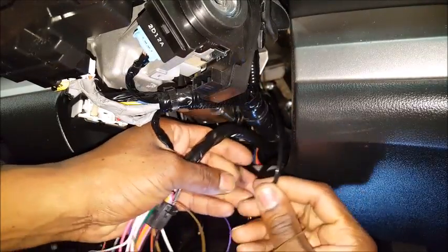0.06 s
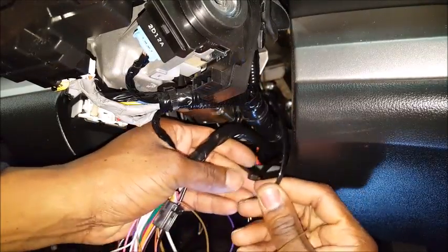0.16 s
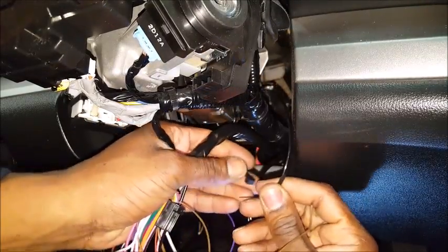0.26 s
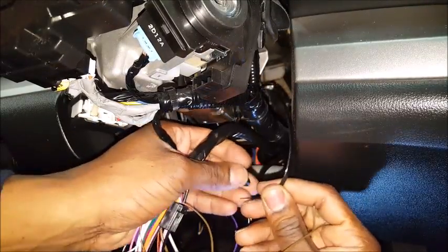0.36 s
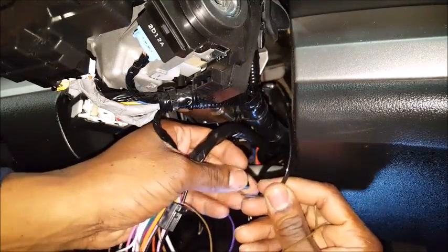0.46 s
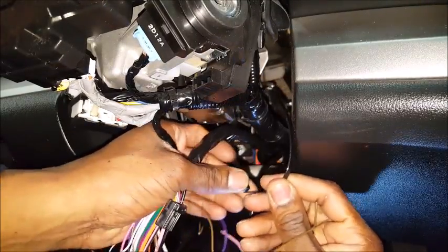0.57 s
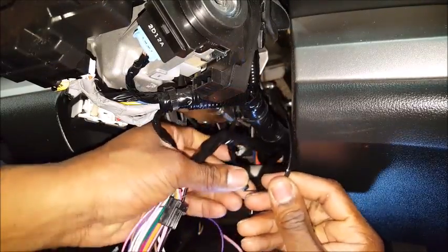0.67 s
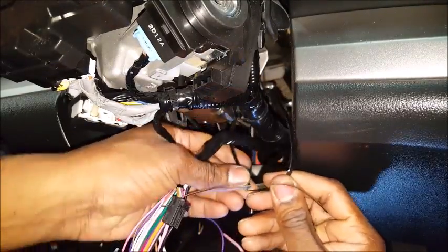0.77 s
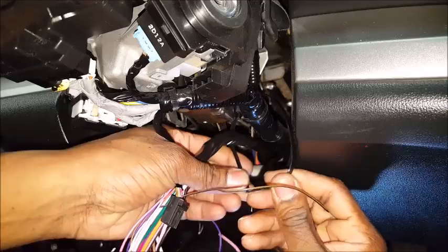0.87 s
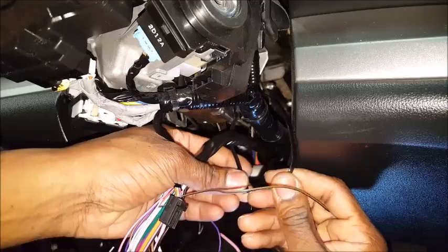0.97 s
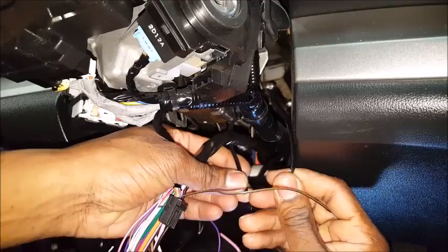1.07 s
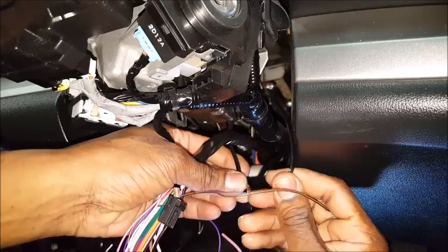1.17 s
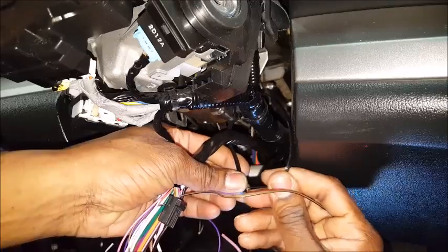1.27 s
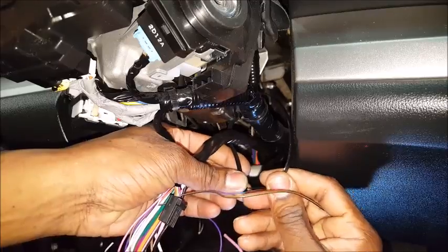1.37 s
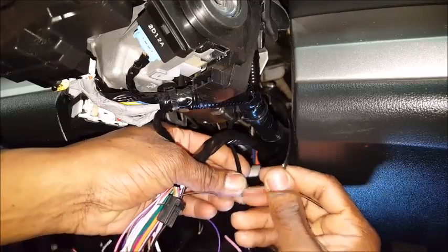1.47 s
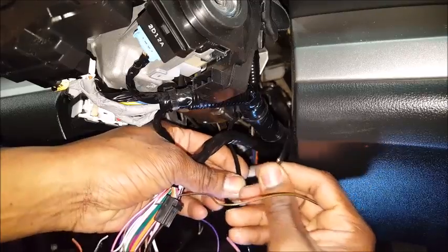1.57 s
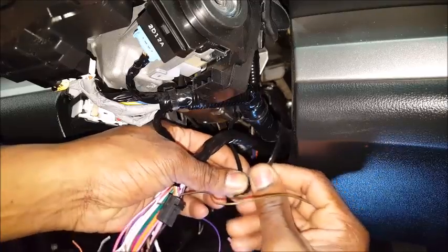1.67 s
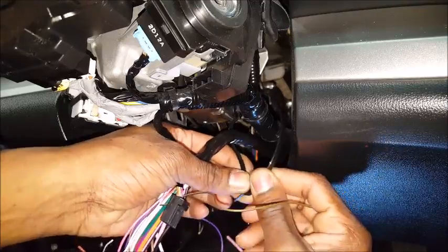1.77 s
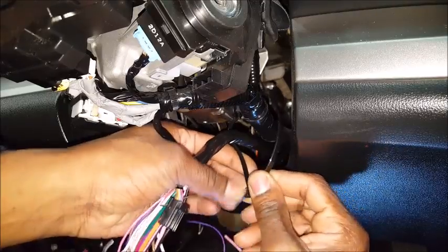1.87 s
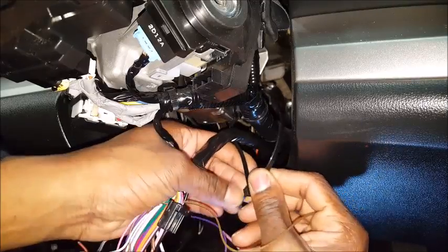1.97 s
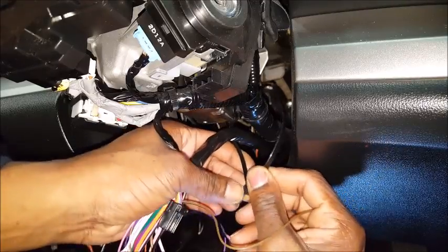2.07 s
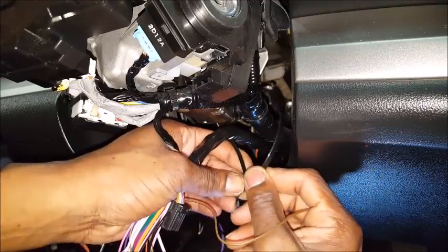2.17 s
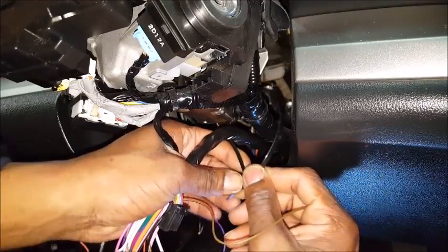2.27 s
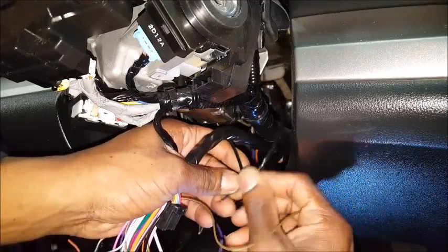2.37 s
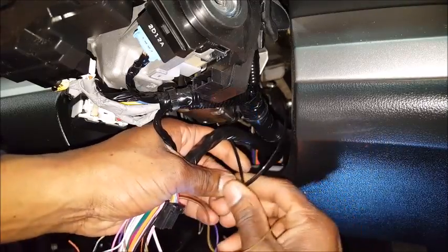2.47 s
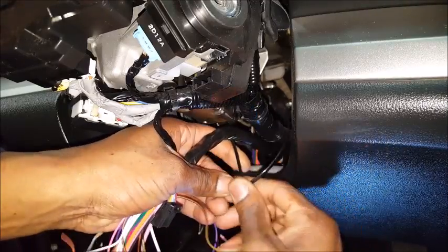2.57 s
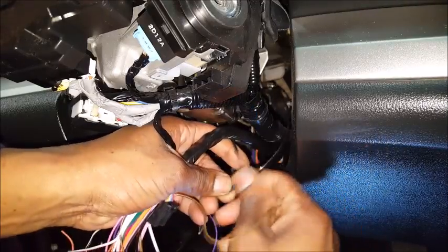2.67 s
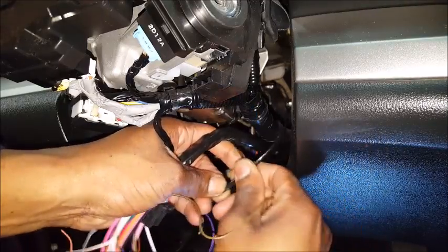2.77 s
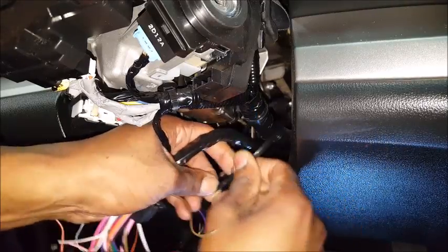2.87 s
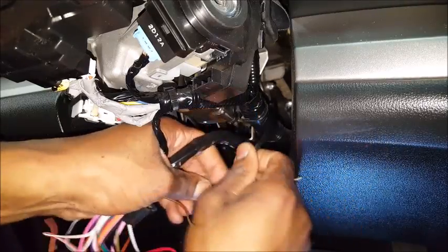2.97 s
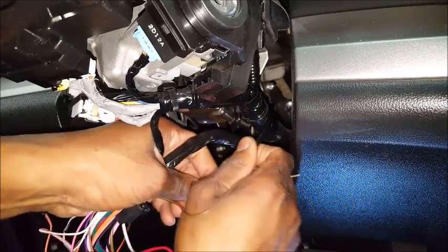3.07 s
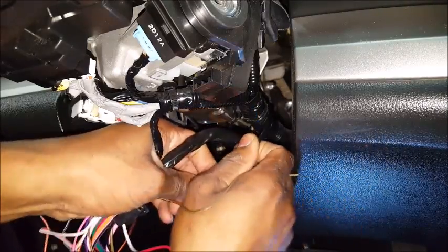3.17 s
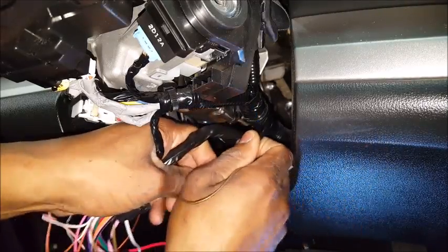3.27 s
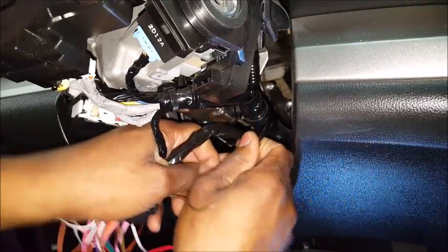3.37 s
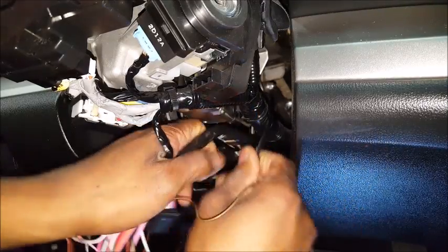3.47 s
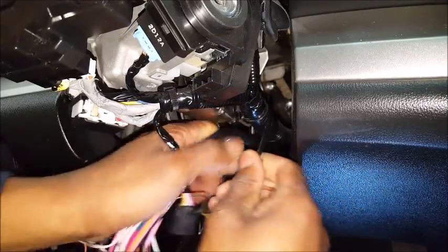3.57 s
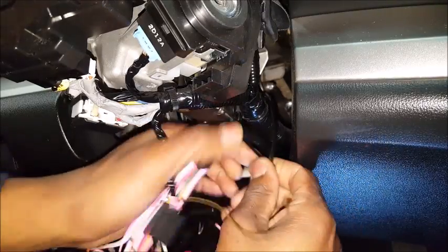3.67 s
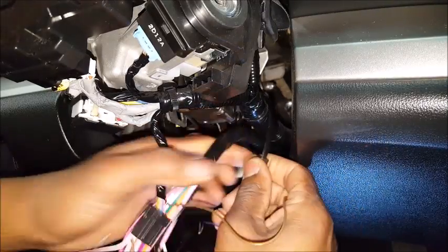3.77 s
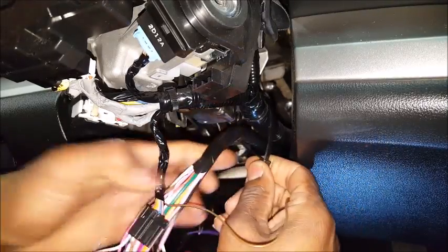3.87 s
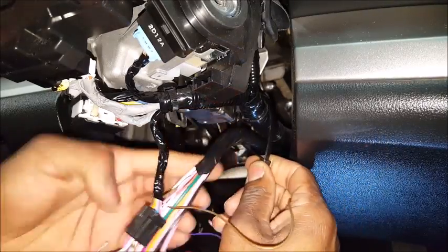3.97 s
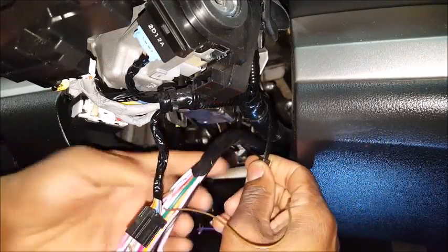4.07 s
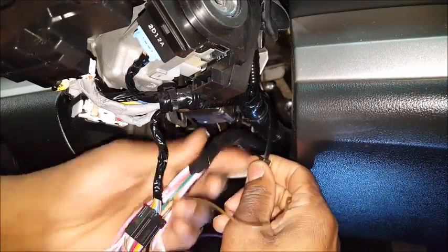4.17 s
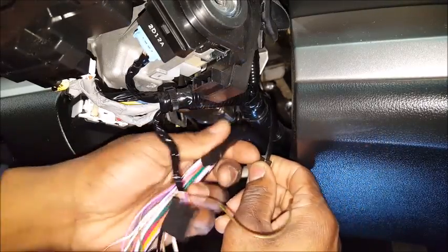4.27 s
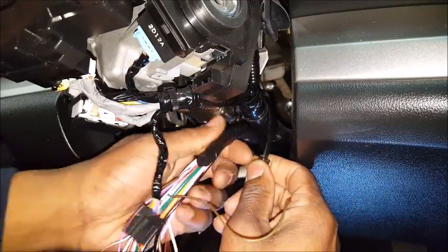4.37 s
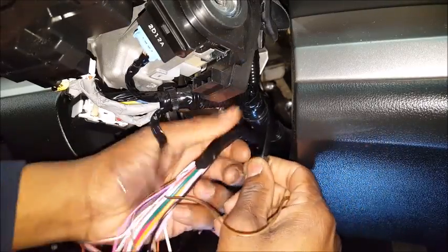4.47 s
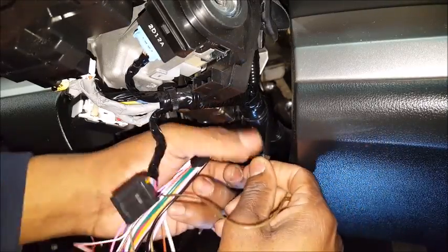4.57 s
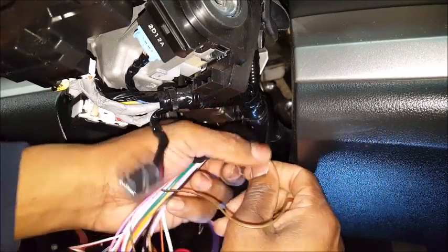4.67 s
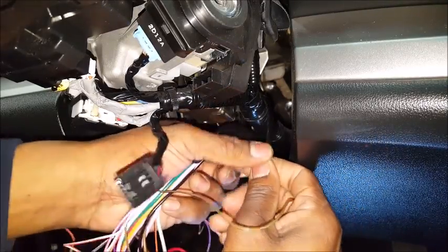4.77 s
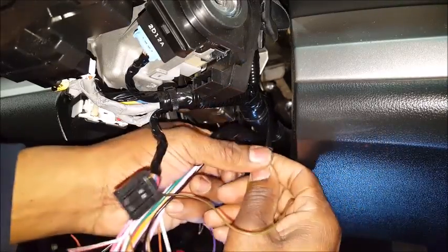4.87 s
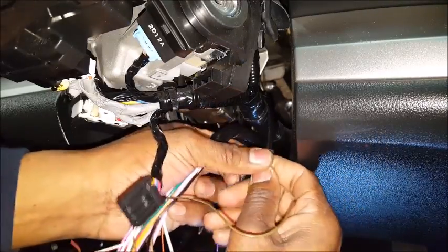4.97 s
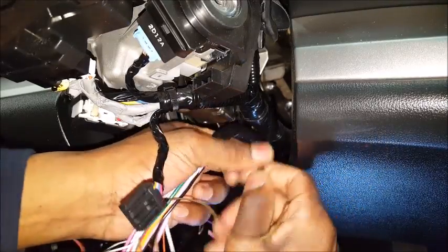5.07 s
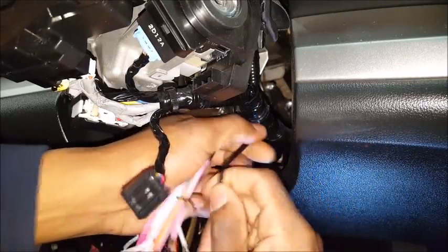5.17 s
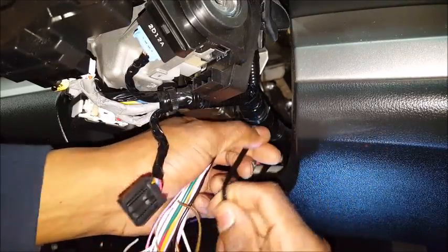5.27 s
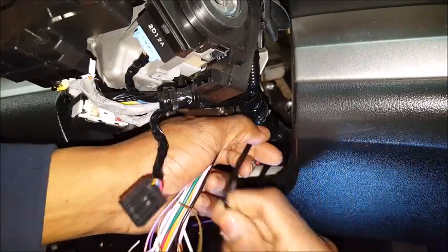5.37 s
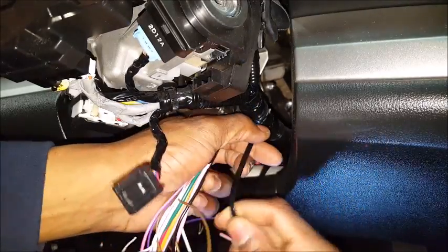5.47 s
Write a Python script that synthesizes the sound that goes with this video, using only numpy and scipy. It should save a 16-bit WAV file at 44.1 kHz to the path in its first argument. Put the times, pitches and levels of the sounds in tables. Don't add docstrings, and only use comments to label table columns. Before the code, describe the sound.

Very close stereo sound in a small, dry car footwell. Fingertips tap and scuff wires and loose clips, sparse and faint over low hum. A cable tie then clicks rapidly through its head, much louder and brighter than the handling. After a few stray catches come rustles, dull bumps on trim and a sharp snap, then a second, quicker zip slows into single clicks.

```python
import sys
import numpy as np
from scipy import signal
from scipy.fft import rfft, irfft, next_fast_len
from scipy.io import wavfile
from scipy.ndimage import uniform_filter1d

SR = 44100
rng = np.random.default_rng(int(sys.argv[2]) if len(sys.argv) > 2 else 0)


def unload_audio(sound):
    columns = np.transpose(np.atleast_2d(sound))
    steps = np.round(np.clip(columns, -1, 1) * 32767)
    wavfile.write(sys.argv[1], SR, steps.astype(np.int16))


def field_ratio(decibels):
    return 10 ** (np.asarray(decibels, dtype=float) / 20)


N = 243873

# time in seconds, teeth passed so far.
SLIDE_TRAVEL = [
    [(2.7324, 0), (2.7366, 2), (2.7484, 8), (2.7505, 9), (2.7535, 10)],
    [(5.1198, 0), (5.1329, 4), (5.1386, 6), (5.1511, 10), (5.1624, 14), (5.1696, 17), (5.1791, 22),
     (5.1849, 26), (5.195, 36), (5.2015, 42), (5.2104, 48), (5.2207, 56), (5.2264, 60), (5.232, 63),
     (5.2341, 64), (5.2371, 65), (5.2407, 66)],
]
# time in seconds, snap level in dB, push relative to it in dB,
# lean to the left in dB.
SLIDE_EFFORT = [
    [(2.732, -16, -27, 0), (2.74, -15, -23, -5), (2.746, -20, -26, -3), (2.7545, -13, -30.5, 0.3)],
    [(5.119, -22, -32, 8), (5.14, -21, -22.5, -1), (5.158, -19, -23, -4), (5.17, -19.5, -24, 1.2),
     (5.182, -15.5, -29, -1), (5.19, -22.5, -24, -2), (5.203, -19.5, -24, 0), (5.222, -22, -29.5, 0),
     (5.241, -23, -29, 8)],
]
# time in seconds, snap level in dB,
# push on the strap relative to it in dB, knock relative to it in dB.
CATCHES = [(2.7603, -14, -25, -28), (2.7711, -19, -18.5, -21), (2.7815, -17, -23.5, -31),
           (2.7915, -21, -30, -19.5), (2.8105, -18, -15, -52), (2.8312, -19, -15.5, -57),
           (2.8435, -16.5, -17, -50), (3.1028, -19.5, -12, -51), (3.1114, -15, -19, -46),
           (3.1206, -21.5, -17, -31), (3.1454, -18.5, -14.5, -56), (3.1957, -20, -16.5, -57),
           (3.2755, -21, -8, -20), (5.1133, -19, -11.5, -32), (5.2492, -21, -19, -44),
           (5.2624, -21.5, -20, -24), (5.2779, -23.5, -11.5, -29), (5.3268, -22, -16.5, -28),
           (5.3373, -22, -35, -50), (5.3483, -20, -19.5, -51), (5.3603, -21, -18.5, -58),
           (5.373, -25.5, -17.5, -46), (5.3813, -22.5, -10.5, -56), (5.3942, -21.5, -15, -37),
           (5.4196, -19, -20.5, -45)]
# time in seconds, snap level in dB.
STEADY_TEETH = [(2.851, -22), (2.8564, -21), (2.8642, -16.5), (2.8743, -16), (2.8835, -14), (2.892, -20),
                (2.8998, -17), (2.9093, -17.5), (2.917, -17), (2.9281, -20.5), (2.9372, -18), (2.9457, -17),
                (2.9534, -23), (2.9614, -16), (2.97, -18.5), (2.9778, -18.5), (2.9847, -18),
                (2.9902, -17.5), (2.9944, -18), (2.9977, -18), (3.0065, -18), (3.0159, -19.5), (3.022, -17),
                (3.0309, -18), (3.0411, -15), (3.0524, -17.5), (3.065, -18), (3.0755, -17), (3.0857, -19),
                (3.095, -19.5)]
# time in seconds, push and knock relative to the snap in dB.
STEADY_EFFORT = [
    (2.85, -20, -28.5),
    (2.92, -25.5, -32),
    (2.975, -22, -19.5),
    (2.994, -27.5, -20.5),
    (3.02, -24, -28),
    (3.065, -29, -38),
    (3.095, -21, -35),
]
# time in seconds, pitch of the pawl's ring in Hz,
# lean to the left of the snap in dB, of the push in dB.
CLOSING_LOOP = [(2.73, 12600, -2, -7), (2.795, 11300, 5, 16), (2.81, 11400, 0, 13.5),
                (2.92, 10300, -0.5, 1), (2.97, 10400, 2, 0), (3.1, 11400, 1.5, 1), (3.28, 11860, -2, 5.5),
                (5.11, 13450, -9, -15.5), (5.19, 13100, -3, 4.5), (5.28, 11500, 1, -3.5),
                (5.33, 11000, 1, 5.5), (5.42, 10700, 1.5, 10.5)]
# frequency in Hz, level in dB per Hz.
SLOW_RING = [(4000, -34.5), (6300, -20.5), (6750, -14), (7600, -11), (8600, -10.5), (9600, -9.5),
             (10800, -8), (12000, -7), (13500, -4.5), (15000, -9), (15800, -7), (16500, -34)]
# frequency in Hz, level in dB per Hz.
FAST_RING = [(2650, -21), (4500, -31), (6200, -24), (6910, -18), (8320, -17), (9270, -17), (10400, -9),
             (11200, -6.5), (12000, -5.5), (12900, -1.5), (14000, -6.5), (15800, -7), (16500, -25)]
# start in seconds, length in seconds, level in dB.
DRAGS = [
    (2.733, .065, -63),
    (2.845, 0.25, -40.5),
    (5.115, 0.139, -33.5),
    (5.327, 0.083, -41),
]
# frequency in Hz, level in dB per Hz.
DRAG_COLOUR = [(300, -18), (1000, -17), (2500, -5.5), (5000, -1.5), (6300, -7.5), (6800, -2), (8000, 0.5),
               (9500, 3.5), (11000, 16), (12500, 4.5), (15800, -2.5), (16000, -56)]
# time in seconds, level in dB, fizz relative to it in dB,
# ring in Hz.
TAPS = [(0.0273, -48.5, 16, 1580), (0.0643, -45, 4, 1010), (0.0803, -51.5, 12.5, 2780),
        (0.2956, -41, -11, 1150), (0.3097, -36.5, -11, 2250), (0.4245, -50, -17, 1240),
        (0.452, -29, 6.5, 2200), (0.5792, -41.5, -21, 1550), (0.7035, -42.5, -26, 1210),
        (0.7394, -42, -31, 1110), (1.1005, -50.5, 7, 2200), (1.5384, -39.5, 2, 950),
        (1.5742, -45.5, 9.5, 2190), (1.9626, -63.5, 19.5, 1950), (2.049, -47.5, 8.5, 969),
        (2.4024, -54.5, 9, 3270), (2.6854, -48, -19, 1780), (3.26, -41, -9, 1200), (3.3465, -41, -34, 1350),
        (3.393, -36, 2, 2030), (3.4904, -44, -10, 1160), (3.5887, -44.5, 4, 3880), (3.6295, -36, -4, 3810),
        (4.0246, -48, 1, 900), (4.0876, -39, 7.5, 900), (4.2441, -60, 4.5, 1180), (4.271, -55, -14, 2770),
        (4.476, -51.5, -0.5, 1950), (4.6293, -39, -12.5, 2000), (4.806, -42, -12, 1910)]
# time in seconds, level in dB, fizz relative to it in dB, ring in Hz.
SCUFFS = [(0.4945, -47, 9.5, 966), (0.547, -44, 2, 2100), (1.0848, -50.5, 10.5, 1100),
          (1.337, -52, 7.5, 2200), (1.3536, -56.5, 6, 1060), (2.1575, -48, 3, 1010),
          (2.1704, -52, 16, 2120), (2.2797, -53, 5, 910), (2.662, -43, -42, 1830),
          (3.305, -38.5, -13, 1190), (3.4774, -42.5, 12, 2830), (3.5162, -42, -13, 1230),
          (3.524, -43, 7, 1180), (3.5504, -55, 19, 902), (4.3277, -56, 2, 2440), (4.3532, -59, -20, 1020),
          (4.544, -52, -5, 1140), (4.57, -48.5, -19, 2120), (4.818, -41, -25, 1170), (5.09, -51, 9, 1000),
          (5.468, -55.5, -10, 1320), (4.136, -50.5, -40.5, 1680), (4.106, -51, -41.5, 600),
          (3.799, -49, -37, 1320), (0.387, -59, -15, 1900)]
# time in seconds, level in dB, fizz relative to it in dB, ring in Hz.
CRACKS = [
    (2.455, -48.5, 24.5, 907),
    (2.4625, -42.5, 22, 918),
    (2.5295, -42.5, 22, 1010),
    (2.553, -33, 10, 902),
    (2.5584, -36, 4, 1810),
    (2.712, -51.5, -2.5, 1480),
    (3.6474, -21, 11.5, 4180),
    (3.8616, -46.5, 15.5, 995),
]
# time in seconds, level in dB.
FLECKS = [(0.045, -54), (0.1535, -47), (0.2823, -60), (0.3284, -66), (0.565, -43), (0.6494, -64),
          (1.066, -62), (1.617, -59), (1.7654, -57), (1.873, -54), (2.0283, -61), (2.0434, -56),
          (2.2934, -54), (2.564, -50), (3.7534, -63), (3.8404, -55.5), (4.2164, -71), (4.2334, -55),
          (4.3076, -49.5), (4.468, -54), (4.4977, -55), (1.568, -43), (5.0195, -58), (0.232, -64),
          (0.404, -56), (2.205, -64), (5.5255, -47)]
# frequency in Hz, level in dB per Hz.
FIZZ = [(2500, -26), (5500, -4), (8000, -6.5), (10500, 0), (13000, -1), (15500, -8.5), (17000, -9.5)]
# time in seconds, level in
# dB, ring in Hz, time to fall 60 dB in seconds.
PINGS = [(0.0824, -35.5, 2870, 0.0083), (0.2967, -36, 2120, 0.03), (0.4524, -59, 2550, 0.014),
         (1.7146, -34, 3300, 0.0077), (1.734, -53, 3340, 0.014), (2.4, -47.5, 3280, 0.031),
         (3.5, -48, 1270, 0.021), (4.136, -48.5, 964, 0.039), (4.139, -49.5, 2060, 0.013),
         (4.203, -65, 2790, 0.013), (4.328, -62.5, 2440, 0.015), (4.355, -51, 2530, 0.011),
         (0.297, -40, 1130, 0.029), (0.311, -36.5, 2170, 0.016), (1.576, -54, 7800, 0.02),
         (3.306, -41.5, 1240, 0.019), (3.63, -37, 2680, 0.012), (3.63, -44, 4200, 0.012),
         (3.8, -51.5, 1200, 0.023), (5.326, -27, 6100, 0.007), (5.338, -33, 6100, 0.0082),
         (5.349, -33, 6430, 0.007), (5.361, -32, 6300, 0.0077), (5.396, -39, 6200, 0.007)]
# time in seconds, level in dB, ring in Hz, time to fall 60 dB in seconds.
KNOCKS = [(0.295, -41, 677, 0.061), (0.45, -41.5, 350, 0.095), (1.099, -41.5, 376, 0.032),
          (2.172, -40, 211, 0.031), (2.553, -33, 444, 0.0077), (3.551, -43, 260, 0.037),
          (4.1, -44, 604, .02), (4.106, -45, 292, 0.058), (4.227, -47, 160, 0.036),
          (4.278, -50.5, 260, 0.022), (4.353, -39.5, 435, 0.028), (4.543, -39, 233, 0.02),
          (4.808, -39, 263, 0.035)]
# time in seconds, grip level in dB, sliding of skin in dB.
HANDS = [(0.0, -68, -64.5), (0.29, -66.5, -61.5), (0.58, -56, -53), (0.86, -72, -71.5), (1.4, -74, -72),
         (1.6, -68.5, -70), (2.1, -63, -72.5), (2.17, -66, -68), (2.41, -58.5, -65), (2.71, -68, -69.5),
         (3.16, -60, -62.5), (3.536, -57, -62.5), (3.858, -73.5, -76.5), (4.348, -64.5, -67.5),
         (4.884, -63.5, -70.5), (4.954, -71.5, -72.5), (5.09, -56.5, -72.5), (5.5, -80, -68.5)]
# start in seconds, length in seconds, level in dB.
RUBS = [
    (1.3, .1, -71),
    (2.225, .1, -66),
    (2.45, .08, -69),
    (3.65, .12, -62),
    (4.28, .06, -66),
]
# start in seconds, length in seconds, level in dB.
RUSTLES = [(0.0, 0.2, -83), (.27, 0.065, -61), (.44, 0.038, -94), (.54, 0.24, -76.5), (2.14, 0.06, -70),
           (2.44, 0.21, -82), (3.13, 0.094, -80), (3.28, 0.31, -78), (3.44, 0.2, -70.5), (3.66, .13, -74.5),
           (4.22, 0.16, -80), (4.53, 0.11, -76), (4.76, .12, -76), (5.04, .07, -82.5)]
# frequency in Hz, level in dB per Hz.
THUD_COLOUR = [(47, -40), (80, -10), (123, -2), (183, -10), (248, -9), (283, -6.5), (498, -22),
               (600, -13.5), (780, -45.5), (1320, -120)]
# frequency in Hz, level in dB per Hz.
SKIN_COLOUR = [(150, -42), (250, -9.5), (368, -2.5), (486, -2), (789, -2.5), (858, -6), (1220, -7),
               (1330, -8.5), (1500, -9), (1690, -9.5), (2100, -8.5), (2740, -15), (4500, -37.5),
               (5850, -65.5), (9900, -120)]
# frequency in Hz, level in dB per Hz.
HISS_COLOUR = [(1760, -19), (3000, -2), (7750, -13), (9460, -13), (13300, -7.5), (15100, -15.5),
               (15800, -7), (16000, -52)]
# start in seconds, length in seconds, level in dB,
# starting pitch in Hz, ending pitch in Hz.
SQUEAKS = [(.46, .14, -70, 2450, 2420), (.48, .17, -61, 800, 790), (.49, .05, -62, 960, 950),
           (.5, .11, -65, 2120, 2150), (.535, .1, -63, 1440, 1560), (.69, .09, -72, 1200, 1140),
           (.15, .13, -66, 1230, 1200), (.17, .14, -64, 810, 800), (.3, .15, -63, 800, 770),
           (.1, .16, -72, 2200, 2120), (3.51, .06, -56, 410, 320), (2.59, .07, -73, 1850, 1850),
           (4.3, .035, -66, 1200, 1180)]
# frequency in Hz, time to fall 60 dB in seconds.
CABIN_DECAY = [(300, .06), (2000, .065), (6000, .036), (12000, .024)]
# frequency in Hz, level in dB per Hz.
AIR_COLOUR = [(12, -41.5), (20, -26), (58, -3), (124, -13), (179, -15.5), (244, -11), (289, -36.5),
              (342, -17.5), (1210, -36.5), (9410, -47), (15800, -42.5), (16000, -81.5)]
# frequency in Hz, width in Hz, level in dB.
HUM = [
    (53, 11, -70),
    (119.5, 15, -68),
]
# frequency in Hz, left-right likeness from -1 to 1.
LIKENESS = [(60, 0.74), (180, 0.93), (550, 0.62), (1650, -0.43), (4970, 0.068), (15000, -0.16)]

RUSTLE_EDGE_S = 0.038


def tie():
    fast = np.vstack([slide_teeth(*slide) for slide in zip(SLIDE_TRAVEL, SLIDE_EFFORT)])
    fast = np.c_[fast, fast[:, 2]]
    single = np.vstack([CATCHES, steady_teeth()])
    scatter_db = -2 * rng.standard_normal((len(single), 1))
    lean_db = loop(single[:, :1], column=2) + scatter_db
    single = np.insert(single, [3], lean_db, axis=1)
    slow = snaps(single, SLOW_RING, lag=2, spike_ms=0.027, knock_ms=0.82, knock_db=4.0, spike_db=15,
                 scrape_db=5.5, alike=0.17, spike_at_ms=0.629, tail_db=-16.5, pawl_db=-6.0,
                 side_db=5.5, strap_db=-34.5)
    quick = snaps(fast, FAST_RING, lag=3, spike_ms=0.085, knock_ms=0.56, knock_db=3, spike_db=16,
                  scrape_db=0, alike=0.93, spike_at_ms=0.45, tail_db=-14.5, pawl_db=-6.0,
                  side_db=-0.7, strap_db=-12.5)
    return signal.lfilter(*signal.butter(N=2, Wn=70, btype="high", fs=SR), [slow, quick])


def slide_teeth(travel, effort):
    s, passed = np.transpose(travel)
    at = np.interp(np.arange(passed[-1] + 1), passed, s)
    times, *columns = np.transpose(effort)
    even = np.transpose([at] + [np.interp(at, times, c) for c in columns])
    spread = [2.5e-5, 1.2, 1.2, 1.5]  # s, dB, dB, dB
    return even + rng.standard_normal((len(at), 4)) * spread


def steady_teeth():
    times, *levels = np.transpose(STEADY_EFFORT)
    at = np.transpose(STEADY_TEETH)[0]
    effort_db = np.transpose([np.interp(at, times, c) for c in levels])
    uneven_db = rng.standard_normal((len(at), 2)) * (1.5, 1)
    return np.c_[STEADY_TEETH, effort_db + uneven_db]


def loop(s, column):
    return np.interp(s, *np.transpose(CLOSING_LOOP)[[0, column]])


def snaps(teeth, ring, lag, spike_ms, knock_ms, knock_db, spike_db, scrape_db, alike, spike_at_ms,
          tail_db, pawl_db, side_db, strap_db):
    t = np.arange(300) / SR
    ms = t * 1e3
    shape = (1 - np.exp(-t / 0.00058)) ** 3 * (np.exp(-t / 0.00056) + field_ratio(tail_db) * np.exp(-t / 0.0016))
    knock = -(ms / knock_ms) ** 2 * np.exp(2 - 2 * ms / knock_ms)
    after = np.maximum(t - spike_at_ms / 1e3, 0)
    loose_end = np.exp(-after / 0.00053) * np.sin(2 * np.pi * 2000 * after)
    spike = field_ratio(strap_db) * loose_end - np.exp(-((ms - spike_at_ms) / spike_ms) ** 2)
    ring_taps = causal(ring)
    out = np.zeros((2, N + len(t)))
    chance = rng.standard_normal((140, 5, len(t)))
    repeated = max(alike, 0.5)
    for (s, db, push_db, pan_db, thud_db), (a, b, c, d, e) in zip(teeth, chance):
        shared = np.sqrt(1 - repeated) * c + np.sqrt(repeated) * chance[-1, 0]
        rattle = 0.8 * np.array([shared, np.roll(shared, lag)]) + 0.6 * np.array([a, b])
        head = signal.lfilter(ring_taps, 1, shape * rattle)
        r = np.exp(-np.pi * 810 / SR)
        turn = 2 * np.pi * loop(s, column=1) / SR
        pawl = signal.lfilter([1, 0, -1], [1, -2 * r * np.cos(turn), r * r], head)
        head = evened(head) + field_ratio(pawl_db) * evened(pawl)
        mid = evened(head[0] + head[1])
        side = field_ratio(side_db) * evened(head[0] - head[1])
        head = np.array([mid + side, mid - side])
        head *= sides(pan_db)[:, None] / np.linalg.norm(head, axis=1, keepdims=True)

        grit = np.sqrt(1 - alike ** 2) * np.array([d, e]) + alike * chance[-1, 1:3]
        scrape = shape * signal.lfilter([1], [1, -0.8], grit)
        hard_db = 0.6 * min(push_db + 18, 0)
        spike_lean = field_ratio(1.8 * (1 - alike) * np.array([[d[0]], [-d[0]]]))
        push = field_ratio(spike_db + hard_db) * spike_lean * spike + field_ratio(scrape_db) * scrape
        push *= sides(loop(s, column=3))[:, None]

        tooth = field_ratio(13.5) * head + field_ratio(push_db) * push + field_ratio(thud_db + knock_db) * knock
        out[:, round(s * SR):][:, :len(t)] += field_ratio(db) * tooth
    return out[:, :N]


def drag():
    return bursts(DRAGS, edge_s=0.006) * noise(DRAG_COLOUR, patchy_db=0.5, flicker_db=2.5)


def ticks():
    t = np.arange(1800) / SR
    out = np.zeros((2, N + len(t)))
    fizz_taps = causal(FIZZ)[:64]
    chance = rng.standard_normal((90, 4, len(t)))
    lengths_ms = [(TAPS, 3.06), (SCUFFS, 5.6), (CRACKS, 0.55)]
    rows = [(*row, ms) for table, ms in lengths_ms for row in table]
    rows += [(s, db - 9, 14.5, 2400, 2.4) for s, db in FLECKS]
    pans = 1.9 + 1.5 * rng.standard_normal(len(chance))
    for (s, db, fizz_db, hz, ms), pan_db, (a, b, c, d) in zip(rows, pans, chance):
        shape = (1 - np.exp(-t / 0.0001)) * np.exp(-t / (max(ms, 0.3) * 0.00084))
        slips = (0.43 * c + 1.13 * np.array([a, b])) * field_ratio(8.7 * d)
        r = np.exp(-np.pi * 1000 / SR)
        resonance = [1, -2 * r * np.cos(2 * np.pi * hz / SR), r * r]
        ring = evened(signal.lfilter(np.convolve([1, 1], [1, 0, -1]), resonance, slips))
        body = evened(signal.lfilter([1, 0.1, -0.9], [1, -1.2, 0.4], slips))
        fizz = evened(signal.lfilter(fizz_taps, 1, slips))
        body_gain = 0.32 * field_ratio(1.1 * min(fizz_db + 14.5, 0))
        fizz_gain = 0.16 * field_ratio(fizz_db) * (0.66 + 0.9 * np.exp(-t / (ms * 0.00032)))
        sound = 0.26 * ring + body_gain * body + fizz_gain * fizz
        i = round(s * SR)
        out[:, i:i + len(t)] += field_ratio(db) * sides(pan_db)[:, None] * shape * sound
    return out[:, :N]


def pings():
    t = np.arange(3000) / SR
    out = np.zeros((2, N + len(t)))
    for s, db, hz, t60 in PINGS + KNOCKS:
        decay = field_ratio(db - 4.5 - 60 * t / max(t60, 0.005))
        ring = (1 - np.exp(-t / 0.00018)) ** 2 * decay * np.sin(2 * np.pi * hz * t)
        out[:, round(s * SR):][:, :len(t)] += sides(1.9)[:, None] * ring
    return out[:, :N]


def hands():
    s, *levels = np.transpose(HANDS)
    grip_db, slide_db = (np.interp(np.arange(N) / SR, s, db) for db in levels)
    thud = field_ratio(grip_db) * noise(THUD_COLOUR, patchy_db=5.0, flicker_db=2.5)
    rub_gain = field_ratio(slide_db) + bursts(RUBS, RUSTLE_EDGE_S)
    rub = rub_gain * noise(SKIN_COLOUR, patchy_db=2.0, flicker_db=2.0)
    hiss_db = -78.5 + 0.35 * (slide_db + 65)
    hiss_gain = field_ratio(hiss_db) + bursts(RUSTLES, RUSTLE_EDGE_S)
    return thud + rub + hiss_gain * noise(HISS_COLOUR, patchy_db=1.2, flicker_db=0.8)


def squeaks():
    out = np.zeros((2, N))
    r = np.exp(-np.pi * 190 / SR)
    for s, length, db, from_hz, to_hz in SQUEAKS:
        a, b = rng.standard_normal((2, 2, SR // 5))
        wander = a + 0.21 * a[::-1] + 1j * (b + 0.79 * b[::-1])
        fuzz = signal.lfilter([1], [1, -2 * r, r * r], wander)
        t = np.arange(0, length, 1 / SR)
        turns = np.cumsum(from_hz + (to_hz - from_hz) * t / length) / SR
        tone = evened((fuzz[:, -len(t):] * np.exp(2j * np.pi * turns)).real)
        swell = np.minimum(np.minimum(t, length - t) / 0.025, 1)
        out[:, round(s * SR):][:, :len(t)] += field_ratio(db) * swell * tone
    return out


def cabin(x):
    out = np.zeros_like(x)
    t = np.arange(N) / SR
    for k in range(3):
        taps = np.zeros((2, 4400))
        at = np.arange(50, 4380, 10) + rng.integers(0, 10, (2, 433))
        np.put_along_axis(taps, at, rng.choice([-1., 1.], at.shape), 1)
        hz, s, z = signal.stft(taps, SR, nperseg=64)
        decay = field_ratio(-60 * s / read(CABIN_DECAY, hz)[:, None])
        tail = signal.istft(z * decay, SR, nperseg=64)[1]
        tail = tail / np.linalg.norm(tail[0])
        share = np.sqrt(2 / 3) * np.cos(2 * np.pi * (9 * t + k / 3))
        out += signal.oaconvolve(x * share, tail, axes=1)[:, :N]
    return out


def air():
    length = next_fast_len(N)
    hz = np.fft.rfftfreq(length, 1 / SR)
    booms = 0
    for f, width, db in HUM:
        spectrum = rfft(rng.standard_normal(length)) / (1 + (2 * (hz - f) / width) ** 2)
        booms = booms + field_ratio(db) * evened(irfft(spectrum, length)[:N])
    return field_ratio(-65.5) * noise(AIR_COLOUR, patchy_db=-1.25, flicker_db=3.0) + booms


def noise(points, patchy_db, flicker_db):
    length = next_fast_len(N)
    hz = np.fft.rfftfreq(length, 1 / SR)
    left, other = rfft(rng.standard_normal((2, length)))
    same = np.clip(read(LIKENESS, hz), -1, 1)
    right = same * left + np.sqrt(1 - same ** 2) * other
    pair = irfft(np.array([left, right]) * field_ratio(read(points, hz)), length)
    z = signal.stft(pair, SR, nperseg=512, noverlap=320)[2]
    patches = uniform_filter1d(rng.standard_normal(z.shape[1:]), size=5, axis=0)
    patches = evened(uniform_filter1d(patches, size=10, axis=1))
    flicker = evened(uniform_filter1d(rng.standard_normal(z.shape[2]), size=2))
    z *= field_ratio(patchy_db * patches + flicker_db * flicker)
    return evened(signal.istft(z, SR, nperseg=512, noverlap=320)[1][:, :N])


def bursts(rows, edge_s):
    t = np.arange(N) / SR
    return sum(field_ratio(db) * np.clip(np.minimum(t - s, s + length - t) / edge_s, 0, 1) for s, length, db in rows)


def causal(points):
    hz = abs(np.fft.fftfreq(1024, 1 / SR))
    log_gain = np.log(field_ratio(np.maximum(read(points, hz), -60)))
    taps = np.fft.ifft(np.exp(signal.hilbert(log_gain).conj())).real[:256]
    return taps / abs(taps).max()


def read(points, hz):
    f, value = np.transpose(points)
    return np.interp(np.log(hz + 1), np.log(f + 1), value)


def sides(pan_db):
    return field_ratio(np.multiply.outer([0.5, -0.5], pan_db))


def evened(x):
    return x / np.sqrt(np.mean(x ** 2) + 1e-20)


def scene():
    slow, quick = tie()
    ticking = ticks()
    ringing = pings()
    sent = field_ratio(-8.0) * slow + field_ratio(-11) * quick + field_ratio(-6.5) * ticking + field_ratio(-7) * ringing
    close = slow + quick + ticking + ringing
    return close + cabin(sent) + hands() + squeaks() + air() + drag()


def low_pass(x):
    return signal.sosfilt(signal.butter(12, 17090, fs=SR, output="sos"), x)


def record(dry):
    low, wide = (signal.oaconvolve(dry, signal.firwin(numtaps=601, cutoff=hz, window=("kaiser", 9), fs=SR)[None],
                                   "same", axes=1)
                 for hz in (15950, 16900))
    power = uniform_filter1d((np.diff(low, prepend=0) ** 2).sum(0), size=44)
    before = np.roll(uniform_filter1d(power, size=600), 360)
    attack = power > 25 * before
    near_attack = uniform_filter1d(1. * attack, size=400) > 1e-6
    gate = uniform_filter1d(1. * near_attack, size=200)
    return low_pass(low + gate * (wide - low))


dry = scene()
out = record(dry)
unload_audio(out)
```